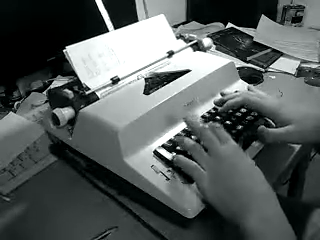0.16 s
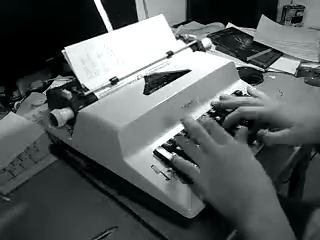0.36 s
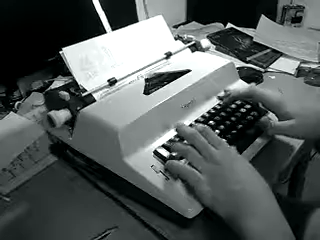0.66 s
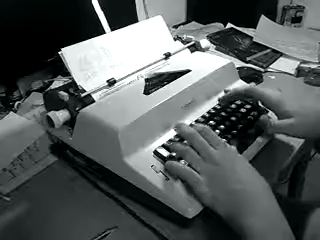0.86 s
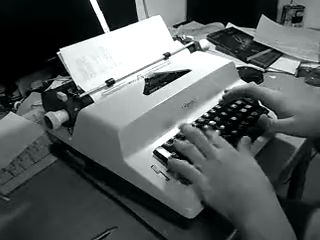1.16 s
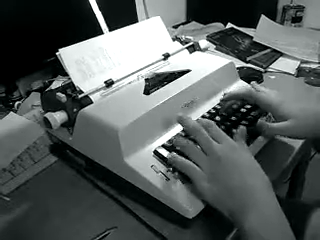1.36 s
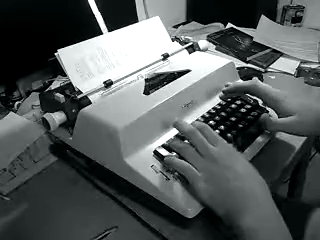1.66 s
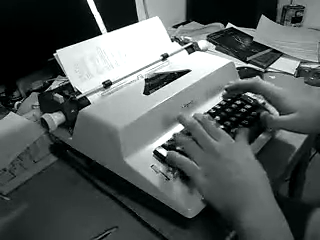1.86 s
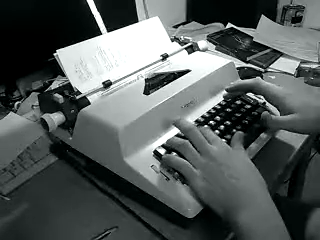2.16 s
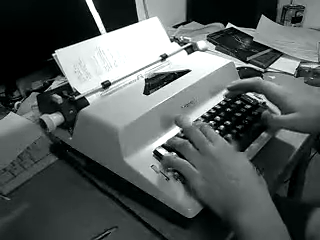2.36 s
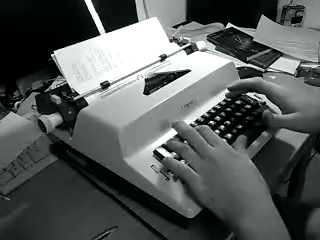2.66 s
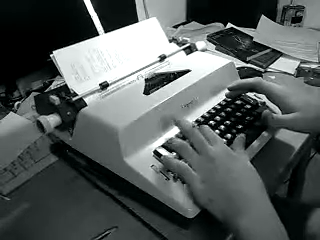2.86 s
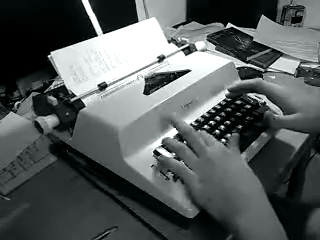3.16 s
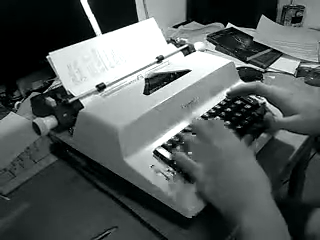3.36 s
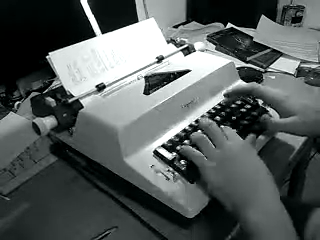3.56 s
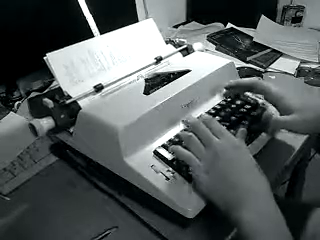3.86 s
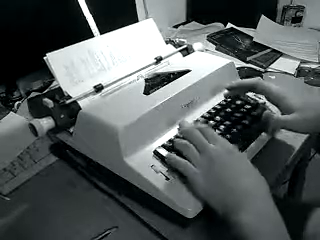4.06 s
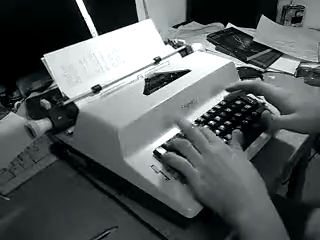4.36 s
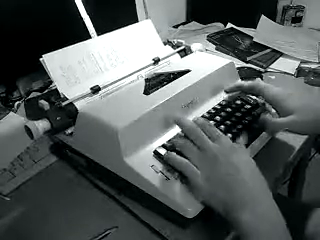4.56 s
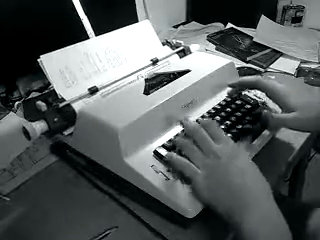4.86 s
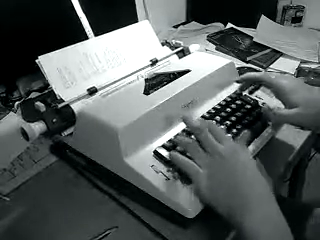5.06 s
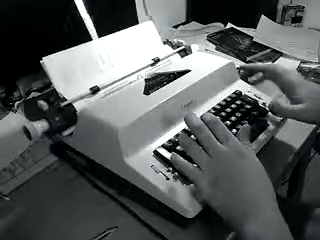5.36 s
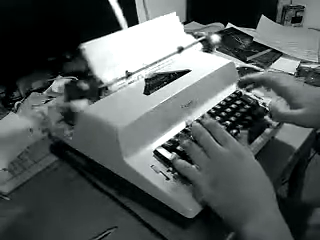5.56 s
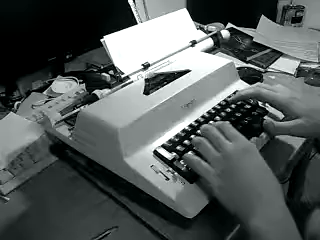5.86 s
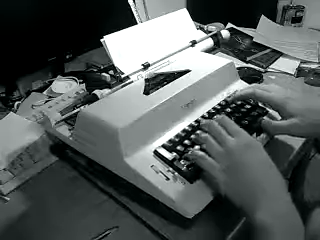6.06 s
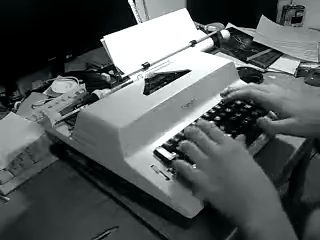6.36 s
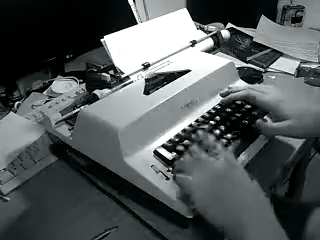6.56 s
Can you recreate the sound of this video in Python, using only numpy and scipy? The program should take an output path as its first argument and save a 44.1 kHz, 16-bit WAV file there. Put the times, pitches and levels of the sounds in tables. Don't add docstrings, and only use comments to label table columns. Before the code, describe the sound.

A typewriter is heard very close and dry through a small, thin-sounding microphone in a quiet room. From 0.06 s, strokes fall irregularly, about two to four a second: a small latch click, a sharp bright crack, a quick steel rattle, then a dull padded thud through casing and desk. Softer carriage steps with short, high metallic pings fall between, as at 0.3, 0.64, 1.03 and 1.76 s. Small gaps open around 1.9 and 2.65 s; a tight run of three blows comes at 2.9-3.2 s, and more typing continues to 5.1 s. At 5.3-5.4 s the return mechanism clacks and pings. The carriage grinds and whirrs quietly from 5.46 to 5.75 s, then slams into its stop at 5.8 s and bounces at 5.85 s. Faint jingling settles after 6 s over barely audible motor hum and air, until a weak key click at 6.65 s.

```python
import sys
import numpy as np
from scipy import signal
from scipy.io import wavfile
from scipy.ndimage import uniform_filter1d

SR = 44100
rng = np.random.default_rng(int(sys.argv[2]) if len(sys.argv) > 2 else 0)


def store_pcm(level_fs):
    pcm = np.round(np.clip(level_fs, -1, 1) * 32767).astype(np.int16)
    wavfile.write(sys.argv[1], SR, np.atleast_2d(pcm).T)


def magnitude_from_level(level_db):
    exponent = np.asarray(level_db, float) / 20
    return 10 ** exponent


N = 295470

# start_s, rattle_db, ring_hz, lower_body_db (against treble), crack_db
LETTERS = [(0.0932, -6, 3800, -16.5, -6), (0.4555, -4, 5670, -11.5, -9.5), (1.2905, -3.5, 6070, -14, -16),
           (1.5312, -5.5, 6100, -26.5, -10.5), (2.2777, -4, 5910, -15, -6.5),
           (2.8886, -4.5, 5750, -17.5, -4.5), (3.056, -4, 5800, -18, -9.5), (3.2243, -3.5, 6010, -18, -6.5),
           (3.6504, -6.5, 5150, -28, -9.5), (3.8272, -6, 5350, -21.5, -3.5),
           (4.388, -4.5, 6140, -13.5, -8.5), (4.7543, -5, 5190, -24.5, -7), (5.0575, -4, 5760, -13.5, -11)]
# start_s, rattle_db, ring_hz, lower_body_db, crack_db
STEPS = [(0.2987, -11, 3800, -18.5, -14.5), (0.6384, -10.5, 3780, -7, -28.5),
         (0.8130, -10.5, 5350, -22, -31), (1.0265, -13, 3840, -16, -31.5), (1.7635, -9, 3705, -18.5, -29),
         (2.5376, -15.5, 3380, -25.5, -21.5), (3.4106, -11, 4750, -30, -28), (4.1743, -9, 5320, -11, -13),
         (4.5735, -11.5, 5470, -14, -26), (4.8975, -10.5, 2830, -25.5, -34.5)]
# start_s, peak_db, ring_hz
EARLY_REBOUNDS = [(0.0945, -12.5, 5670), (0.096, -12.5, 2650), (0.4546, -11, 2660), (1.5321, -9, 2700),
                  (0.1157, -9, 5810), (0.2517, -24, 4900), (0.3007, -16, 3600), (0.3233, -20.5, 5000),
                  (0.334, -15, 6740), (0.4234, -23.5, 5320), (0.4344, -20.5, 6300), (0.4586, -9.5, 4320),
                  (0.4635, -15, 5040), (0.4911, -15.5, 5640), (0.6214, -25.5, 5040), (0.6415, -10.5, 3710),
                  (0.6462, -21, 3670), (0.78, -22.5, 5760), (0.8255, -11.5, 3620), (0.8526, -16, 4900),
                  (0.8818, -22, 4480), (0.8986, -20.5, 4820), (0.9926, -23, 5440), (1.039, -20.5, 3730),
                  (1.0435, -21.5, 3680), (1.069, -16.5, 4430), (1.271, -27, 6040), (1.2927, -5.5, 5730),
                  (1.297, -13.5, 6070), (1.301, -9.5, 5660), (1.315, -8.5, 6100), (1.5317, -15.5, 5180),
                  (1.5388, -7, 5080), (1.563, -12, 5930), (1.5825, -12, 5080), (1.7259, -28.5, 5400),
                  (1.761, -12, 5070), (1.7655, -21.5, 5400), (1.7723, -12.5, 3580), (1.777, -14.5, 3700),
                  (2.277, -4, 5630), (2.284, -10, 5570), (2.291, -10.5, 5870), (2.3004, -8.5, 5960),
                  (2.3106, -9.5, 5840), (2.3294, -11.5, 6300), (2.5027, -23.5, 5880), (2.524, -16.5, 4870),
                  (2.5394, -15, 3530), (2.5562, -18.5, 4900), (2.891, -12, 5540), (2.8957, -6.5, 5480),
                  (2.9066, -20, 5800), (2.9114, -10.5, 6000), (2.9304, -10.5, 6170), (3.0365, -19, 6030),
                  (3.0573, -8, 5540), (3.0639, -7.5, 5620)]
# start_s, peak_db, ring_hz
LATE_REBOUNDS = [(3.0791, -14.5, 5740), (3.0891, -11.5, 6000), (3.1135, -17.5, 5660), (3.1236, -22, 5770),
                 (3.225, -10.5, 6100), (3.232, -13, 5600), (3.247, -8, 5300), (3.2576, -13, 5900),
                 (3.2803, -22.5, 6070), (3.4127, -20.5, 3940), (3.424, -20, 5270), (3.444, -15.5, 4800),
                 (3.478, -19, 4460), (3.651, -8.5, 2670), (3.6632, -13.5, 4850), (3.7022, -17, 4500),
                 (3.7188, -27.5, 5630), (3.8282, -9.5, 6300), (3.8354, -6.5, 5040), (4.1764, -9.5, 5500),
                 (4.2011, -11, 4920), (4.369, -23.5, 5900), (4.391, -4, 5480), (4.3965, -4, 5530),
                 (4.421, -9.5, 5170), (4.4397, -13, 5000), (4.4478, -13, 4960), (4.5331, -21.5, 5900),
                 (4.541, -16.5, 5400), (4.5875, -7.5, 4930), (4.6152, -10, 4880), (4.7551, -8, 5080),
                 (4.7617, -2.5, 5030), (4.765, -7, 5600), (4.7866, -16, 5360), (4.802, -10.5, 5600),
                 (4.9, -29, 5330), (4.912, -13, 5500), (4.9418, -12, 4750), (5.06, -8, 5580),
                 (5.0676, -10.5, 5780), (5.0895, -15, 5300), (5.11, -9.5, 4860), (5.1147, -20, 5740),
                 (5.3539, -19, 4900), (5.3587, -10.5, 4940), (5.3639, -16, 5400), (5.392, -16.5, 4260),
                 (5.414, -12, 2950), (5.4419, -21, 6000), (5.7517, -18.5, 5060), (5.758, -21, 5100),
                 (5.792, -17, 4800), (5.798, -13, 4150), (5.8534, -12, 4450)]
REBOUND_T60_S = 0.022
# start_s, level_db, whirr_hz, whirr_db
SLIDE = [
    (5.46, -52, 406, -65),
    (5.488, -50, 368, -71),
    (5.518, -43.5, 350.4, -54.5),
    (5.65, -46, 365, -57.5),
    (5.686, -47, 377, -62.5),
    (5.746, -51, 360, -48.5),
]


def evened(x):
    return x / np.sqrt(np.mean(x ** 2) + 1e-20)


def colour(x, points):
    f, db = np.transpose(points)
    hz = abs(np.fft.fftfreq(4096, 1 / SR))
    gain_db = np.interp(np.log(hz + 1), np.log(f + 1), db)
    log_gain = np.log(magnitude_from_level(np.maximum(gain_db, -100)))
    minimum_phase = -signal.hilbert(log_gain).imag
    taps = np.fft.ifft(np.exp(log_gain + 1j * minimum_phase)).real[:2048]
    return signal.oaconvolve(x, taps / np.linalg.norm(taps))[:len(x)]


def resonate(x, hz, width):
    r = np.exp(-np.pi * width / SR)
    turn = 2 * np.pi * hz / SR
    gain = np.sin(turn) * np.sqrt(2 - 2 * r * r)
    return signal.lfilter([gain], [1, -2 * r * np.cos(turn), r * r], x)


def filtered(x, order, hz, kind):
    return signal.sosfilt(signal.butter(order, hz, kind, fs=SR, output="sos"), x)


def add(mix, s, sound):
    part = mix[round(s * SR):][:len(sound)]
    part += sound[:len(part)]


def chatter(per_s, spread_db):
    size = magnitude_from_level(spread_db * np.minimum(rng.exponential(1, N), 4)) * rng.standard_normal(N)
    return evened(size * (rng.random(N) < per_s / SR))


def shake(db, rise, t60, bend, jump_db):
    t = np.arange(-.04, .4, 1 / SR)
    fall_db = -60 * (np.maximum(t, 0) / t60) ** bend
    fall_db -= 60 * (np.maximum(t, 0) / 0.3) ** 4
    return magnitude_from_level(db + np.where(t < 0, 20 * t / rise - jump_db, fall_db))


def many_parts(knocks, width, count):
    part = rng.integers(0, count, N)
    pitches = (np.arange(count) + rng.random(count)) * 16000 / count + 300
    return sum(resonate(knocks * (part == k), hz, width) for k, hz in enumerate(pitches))


def kinds_of_blow():
    # start_s, rattle_db, ring_hz, lower_body_db, crack_db
    latches = [(0.0595, -22.5, 5350, -4.5, -36), (0.079, -16, 5260, -0.5, -39.5),
               (1.2715, -22, 6000, -8, -43), (1.5195, -13.5, 4470, -3.5, -42.5),
               (2.2515, -29.5, 5530, -3, -52.5), (2.8494, -51.5, 5580, 8.5, -69),
               (2.8654, -30.5, 5560, -28.5, -51), (3.035, -21, 6070, -3.5, -32.5),
               (3.1986, -23.5, 5330, -1, -41.5), (3.6157, -36, 5170, 5.5, -51),
               (3.6366, -15, 2820, -2, -29.5), (4.3663, -19, 6070, -8, -35.5),
               (4.7435, -15, 6800, -2.5, -36.5), (5.033, -22.5, 6240, -2, -27.5),
               (6.6518, -47.5, 5500, -5.5, -54), (6.6618, -30, 5630, -22, -55),
               (6.686, -30.5, 4630, -23, -48)]
    # start_s, rattle_db, ring_hz, lower_body_db, crack_db
    presses = [(0.2309, -32.5, 4450, -26, -40.5), (0.2508, -19.5, 5410, -7.5, -39),
               (0.6, -24, 5530, -7.5, -45), (0.622, -23.5, 5520, -10, -40), (0.755, -57, 5580, -13, -58),
               (0.7776, -22, 5630, -7.5, -38.5), (0.9647, -39.5, 5490, 2.5, -54),
               (0.9906, -24, 5560, -10, -40.5), (1.725, -25, 5445, -7, -36.5),
               (2.4658, -45, 4750, -21, -42), (2.4922, -25.5, 5850, -6.5, -28),
               (3.3687, -22, 5490, -3, -38.5), (3.797, -35.5, 5500, -4.5, -44),
               (3.816, -17, 4430, 0.5, -38.5), (4.1061, -51, 5870, 2, -59.5),
               (4.1298, -28, 5290, -5.5, -32), (4.5326, -23, 5380, -3, -29.5),
               (4.727, -29, 5580, -3, -45.5)]
    # start_s, rattle_db, ring_hz, lower_body_db, crack_db
    knocks = [(0.322, -17.5, 4700, -24.5, -12.5), (0.8495, -14, 4570, -8, -20),
              (1.0657, -14.5, 4570, -7, -28), (1.3159, -18, 6020, -15, -22), (2.5243, -13, 5300, -10, -33),
              (2.5564, -15, 4700, -24.5, -18.5), (3.4432, -15, 5470, 0, -14.5),
              (4.157, -18, 5300, -22, -37), (4.2006, -15, 4740, -1.5, -30), (4.6148, -14, 4700, -2, -12.5),
              (4.9428, -13, 4900, -1.5, -14), (5.3534, -24, 4900, 4, -10.5)]
    # start_s, rattle_db, ring_hz, lower_body_db, crack_db
    dry_taps = [
        (0.4245, -19.5, 6170, -6.5, -24.5),
        (0.4334, -17, 6150, -27.5, -37.5),
        (2.8, -64, 2500, 14, -64),
        (5.7516, -9.5, 4820, -5.5, -19),
    ]
    # start_s, rattle_db, ring_hz, lower_body_db, crack_db
    carriage_return = [
        (5.3112, -27.5, 3470, -6.5, -47),
        (5.3353, -15.5, 3560, -10, -40.5),
        (5.391, -13, 4270, -5, -17),
        (5.4114, -23, 3750, 7.5, -16),
        (5.5982, -35, 5070, -8, -43.5),
        (5.697, -32, 5000, 5, -57),
        (5.7907, -6.5, 4480, -26, -24),
        (5.8108, -26, 5460, 2, -16),
        (5.852, -18.5, 4670, 2.5, -16.5),
    ]
    # start_s, rattle_db, ring_hz, lower_body_db, crack_db
    settling = [
        (6.001, -40.5, 5760, 0, -36.5),
        (6.06, -55, 4950, -7, -55),
        (6.125, -55.5, 5070, 6, -56),
        (6.2468, -60, 4810, 10, -56.5),
        (6.3886, -58, 3860, 8, -58),
    ]
    return [(LETTERS, 0.007, 8, 0.26, 0.01, 0.11),
            (latches, 0.007, 4.1, 0.39, 0.007, 0.18),
            (STEPS, 0.015, 2.2, 0.22, 0.015, 0.025),
            (presses, 0.026, 1.9, 0.3, 0.022, 0.04),
            (knocks, 0.0077, 5, 0.18, 0.014, 0.072),
            (dry_taps, 0.004, 6, 0.11, 0.018, 0.19),
            (carriage_return, 0.0082, 3.8, 0.24, 0.041, 0.21),
            (settling, 0.01, 4.1, 0.36, 0.081, 0.71)]


def rattles():
    return [(s, db, rise, jump_db, t60, hz, low_db)
            for blows, rise, jump_db, t60, *_ in kinds_of_blow()
            for s, db, hz, low_db, _ in blows]


def contacts():
    return [(row[0] + 0.00063, row[-1], t60, share)
            for blows, *_, t60, share in kinds_of_blow()
            for row in blows]


def type_bars():
    # pitch_hz, level_db (per Hz)
    steel_colour = [(35, -43.5), (60, -46.5), (153, -49), (458, -23.5), (968, -7.5), (1140, -9.5),
                    (1820, -8), (2770, -1), (3040, -4.5), (3670, -2.5), (5860, -0.5), (7750, -9),
                    (9130, -17), (13000, -25), (16000, -38.5)]
    # pitch_hz, width_hz, level_db (against the broad sound)
    frame_modes = [(5760, 62, -24), (5910, 24, -28), (6070, 24, -28), (5300, 340, -18.5), (5880, 3540, -6),
                   (4420, 80, -35.5), (9100, 880, -13.5)]
    force, low_force, rings, cracks, dull = np.zeros((5, N))
    own = chatter(per_s=1400, spread_db=-0.5)
    t = np.arange(1500) / SR
    for s, db, rise, jump_db, t60, hz, low_db in rattles():
        rattle = shake(db - 17.5, rise, t60, bend=1.338, jump_db=jump_db)
        add(force, s - .04, rattle ** 2)
        add(low_force, s - .04, (rattle * magnitude_from_level(low_db)) ** 2)
        struck = own[round(s * SR):][:len(rattle)]
        add(rings, s - .04, resonate(struck * rattle[:len(struck)], hz, width=150))

    hits = contacts()
    bursts = rng.choice([-1., 1.], (len(hits), len(t)))
    for (s, db, t60, share), burst in zip(hits, bursts):
        blunt = np.clip((-27.5 - db) / 30, .2, .8)
        burst = signal.lfilter([np.sqrt(1 - blunt ** 2)], [1, -blunt], burst)
        crack = magnitude_from_level(db - 4 - 60 * t / max(t60, .02)) * np.minimum(t / .0006, 1) * burst
        add(cracks, s - .001, crack)
        add(cracks, s - .0006, magnitude_from_level(db - 0.5) * burst[:1])
        add(dull, s - .001, share * crack)

    for s, db, _ in EARLY_REBOUNDS + LATE_REBOUNDS:
        add(force, s - .0005, magnitude_from_level(db - 22 - 60 * t / REBOUND_T60_S) ** 2)
    run = signal.windows.tukey(round((SLIDE[-1][0] - SLIDE[0][0]) * SR), .2)
    add(force, SLIDE[0][0], (magnitude_from_level(-59.5) * run) ** 2)

    knocks = np.sqrt(force) * chatter(per_s=9000, spread_db=0.0)
    treble = filtered(knocks, 2, 7500, "high")
    hardness = np.minimum(force / magnitude_from_level(-27.5) ** 2, 4)
    knocks = knocks + treble * (magnitude_from_level(-3.5) * hardness ** 0.036 - 1)
    frame = sum(magnitude_from_level(db) * resonate(knocks, f, w) for f, w, db in frame_modes)
    cracks = filtered(cracks, 1, (1300, 9000), "band")
    steel = colour(cracks + frame + many_parts(knocks, width=170, count=80), steel_colour)
    body = resonate(np.sqrt(low_force) * chatter(per_s=3200, spread_db=-3.5), hz=2240, width=1500)
    body = filtered(body, 2, 500, "high")
    return steel + resonate(dull, hz=2000, width=680) + body + magnitude_from_level(-3) * rings


def thuds():
    # start_s, peak_db, t60_s, boom_db (desk against casing)
    carriage_thuds = [
        (5.353, -33.5, 0.23, 1),
        (5.429, -39, 0.49, -15),
        (5.808, -13, 0.22, -2),
        (5.849, -13, 0.11, -27),
        (6.002, -44, 0.2, -18),
        (6.055, -49, 0.31, -21),
        (6.162, -53, 0.39, -24),
        (6.656, -43.5, 0.47, -18),
    ]
    # peak_db, boom_db (desk against casing)
    letter_falls = [(-18, -13), (-17, -12), (-18, -12.5), (-22.5, -15.5), (-16, -8.5), (-15, -9.5),
                    (-21, -5), (-17, -13.5), (-16, -21), (-16.5, -35.5), (-17, -20.5), (-18, -21),
                    (-16, -15)]
    # peak_db, boom_db (desk against casing)
    step_falls = [(-18.5, -13.5), (-19, -16.5), (-20, -14.5), (-14.5, -22), (-16.5, -16), (-18.5, -19),
                  (-17.5, -23.5), (-17.5, -24.5), (-19.5, -21.5), (-16.5, -19)]
    falls = [(row[0] + 0.064, db, 0.21, boom_db) for row, (db, boom_db) in zip(LETTERS, letter_falls)]
    falls += [(row[0] + 0.062, db, 0.19, boom_db) for row, (db, boom_db) in zip(STEPS, step_falls)]
    return falls + carriage_thuds


def casing():
    # pitch_hz, level_db (per Hz)
    casing_colour = [(150, -28.5), (250, 11.5), (331, -17.5), (580, 11.5), (835, -1.5), (986, -1),
                     (1200, 4), (3000, 1), (3900, -43.5), (6600, -120)]
    # pitch_hz, width_hz, level_db (against the broad sound)
    cover_modes = [(961, 15, -9), (988, 18, -12), (1050, 35, -12), (567, 33, -11), (426, 28, -6.5),
                   (250, 22, -11), (1387, 40, -16)]
    force, boom, landings, stamps = np.zeros((4, N))
    falls = thuds()
    rocking = rng.uniform(-1.1, 1, (len(falls), 4))
    for (s, db, t60, boom_db), rock in zip(falls, rocking):
        thud = shake(db - 12.5, 0.028, t60, bend=0.9, jump_db=3)
        add(force, s - .04, thud ** 2)
        add(boom, s - .04, (thud * magnitude_from_level(boom_db)) ** 2)
        add(landings, s + 0.0037, magnitude_from_level([db - 3]))
        add(landings, s + .009 + 0.0012 * rock[0], magnitude_from_level([db - 0.5]) * rock[1])
        add(landings, s + 0.033 + 0.0029 * rock[2], magnitude_from_level([db - 0.5]) * rock[3])
        add(stamps, s + 0.005, magnitude_from_level([db + boom_db - 1]))
    for s, db, rise, _, t60, _, low_db in rattles():
        jolt = shake(db + low_db - 25, rise, t60, bend=2.1, jump_db=8.5)
        add(force, s - .04, jolt ** 2)
        add(boom, s - .03, (jolt * magnitude_from_level(-9.0)) ** 2)
    knocks = np.sqrt(force) * chatter(per_s=3000, spread_db=1.0) + landings
    cover = colour(knocks, casing_colour)
    cover = cover + sum(magnitude_from_level(db) * resonate(knocks, f, w) for f, w, db in cover_modes)
    cover = signal.lfilter(*signal.iirnotch(345, 4, fs=SR), cover)
    pushes = np.sqrt(boom) * chatter(per_s=3000, spread_db=-0.5) + stamps
    desk = resonate(pushes, hz=134, width=20) + magnitude_from_level(-28.5) * resonate(pushes, hz=146, width=150)
    return cover + desk


def carriage():
    # pitch_hz, level_db (per Hz)
    grind_colour = [(47, -40), (80, -21), (127, 0.5), (309, -6), (353, 0), (482, -1.5), (1400, 0),
                    (1630, 3), (2180, -2), (5050, -4), (16000, -53.5)]
    # pitch_hz, width_hz, level_db
    rail_modes = [(1660, 32, -12), (2480, 24, -15.5), (8630, 60, -26), (10960, 200, -31)]
    s, *columns = np.transpose(SLIDE)
    t = np.arange(s[0], s[-1], 1 / SR)
    level_db, hz, whirr_db = (np.interp(t, s, c) for c in columns)
    rolls = chatter(per_s=6000, spread_db=1.6)
    rolls = rolls * magnitude_from_level(evened(uniform_filter1d(rng.standard_normal(N), size=600)))
    grind = colour(rolls, grind_colour)[:len(t)]
    grind = grind + sum(magnitude_from_level(db) * resonate(rolls, f, w) for f, w, db in rail_modes)[:len(t)]
    wobble = 1.13 + 0.25 * evened(uniform_filter1d(rng.standard_normal(len(t)), size=500))
    whirr = np.sqrt(2) * magnitude_from_level(whirr_db) * wobble * np.sin(2 * np.pi * np.cumsum(hz) / SR)
    out = np.zeros(N)
    add(out, s[0], (magnitude_from_level(level_db) * grind + whirr) * signal.windows.tukey(len(t), .15))
    return out


def pawl():
    # start_s, peak_db, pitch_hz, overtone_db
    pings = [(0.109, -18.5, 3810, -26), (0.2986, -6.5, 3720, -18), (0.6389, -2.5, 3660, -16.5),
             (0.825, -12, 3696, -24), (1.038, -10, 3690, -15), (1.7719, -7.5, 3645, -12),
             (2.5386, -11.5, 3610, -15), (2.8896, -16, 4130, -13), (3.058, -6, 4230, -7),
             (3.2243, -12, 4060, -12), (3.652, -14, 2640, -11.5), (4.175, -12.5, 4490, -23),
             (4.5824, -11.5, 2890, -6), (4.907, -11.5, 2740, -14), (5.0584, -8.5, 3540, -14.5),
             (5.3888, -7, 4390, -10)]
    out, t = np.zeros(N), np.arange(6000) / SR
    onset = np.minimum(t / 0.0063, 1)
    for s, db, hz, over_db in pings:
        tone = magnitude_from_level(-60 * t / 0.033) * np.sin(2 * np.pi * hz * t)
        second = magnitude_from_level(over_db - 5 - 60 * t / .15) * np.sin(2 * np.pi * 2.005 * hz * t)
        third = magnitude_from_level(over_db - 17 - 60 * t / .09) * np.sin(2 * np.pi * 3.14 * hz * t)
        is_pawl = 3600 < hz < 3850
        add(out, s, magnitude_from_level(db) * (tone + is_pawl * (second + third)) * onset)
    return out


def small_parts():
    # start_s,
    # peak_db, pitch_hz
    wires = [(0.081, -32, 8200), (0.112, -18.5, 7550), (2.3245, -41, 14200), (3.655, -41, 14100),
             (3.861, -43, 13400), (4.174, -39, 14200), (4.586, -38, 11800), (5.388, -39.5, 11200),
             (6.688, -36, 4600), (5.802, -24.5, 1030), (5.805, -23.5, 1490), (5.793, -31, 2290),
             (5.848, -21.5, 2230), (5.85, -25, 1490)]
    # start_s, peak_db, ring_hz
    glints = [(0.0932, -29.5, 9110), (0.2975, -34, 9000), (0.323, -24, 9070), (0.4555, -26.5, 8700),
              (0.4653, -27.5, 9840), (0.8519, -33.5, 8550), (1.2916, -24.5, 8830), (1.3007, -31, 8740),
              (1.3317, -34.5, 9800), (1.5308, -26, 8940), (1.7508, -34, 10210), (1.77, -29, 9240),
              (1.7759, -25, 9260), (2.2771, -30, 8910), (2.3255, -27, 9470), (2.5369, -28.5, 9390),
              (2.544, -24.5, 9300), (2.8889, -29, 9000), (2.9002, -31.5, 9020), (3.0569, -23, 9040),
              (3.1222, -30, 9370), (3.2249, -29.5, 9020), (3.424, -30, 9350), (3.4423, -25, 9600),
              (3.6524, -28, 9190), (3.6605, -23, 9630), (3.827, -35, 9020), (4.1769, -30, 9300),
              (4.2007, -24, 9560), (4.3895, -33, 8720), (4.4224, -32.5, 8700), (4.4385, -31.5, 9370),
              (4.5943, -31, 11560), (4.613, -28, 10080), (4.9115, -33, 11480), (4.9413, -24, 8480),
              (5.058, -30.5, 8960), (5.3891, -27, 10980), (5.75, -27, 8610)]
    out, t = np.zeros(N), np.arange(1500) / SR
    onset = np.minimum(t / .0005, 1)
    for s, db, hz in EARLY_REBOUNDS + LATE_REBOUNDS:
        add(out, s - .0005, onset * magnitude_from_level(db - 4 - 60 * t / REBOUND_T60_S) * np.sin(2 * np.pi * hz * t))
    for s, db, hz in wires:
        add(out, s, onset * magnitude_from_level(db - 60 * t / .06) * np.sin(2 * np.pi * hz * t))
    snaps = filtered(rng.standard_normal((len(glints), len(t))), 2, (7500, 12000), "band")
    for (s, db, hz), snap in zip(glints, snaps):
        ring = np.sin(2 * np.pi * hz * t) + snap
        add(out, s - .0005, onset * magnitude_from_level(db + 5.0 - 60 * t / .005) * ring)
    return out


def walls(x):
    at = np.arange(200, 30000, 20) + rng.integers(0, 20, 1490)
    taps = np.zeros(30100)
    taps[at] = rng.choice([-1., 1.], 1490) * magnitude_from_level(-60 * at / SR / .55)
    taps = signal.lfilter([1], [1, -.75], taps)
    return signal.oaconvolve(x, taps / np.linalg.norm(taps))[:N]


def room():
    # pitch_hz, level_db (per Hz)
    air_colour = [(20, -5), (43, -22), (123, -1), (319, -17), (678, -8), (2020, -18), (3800, -21),
                  (5000, -31), (16000, -46)]
    # pitch_hz, width_hz, level_db
    air_tones = [(700, 90, -12), (1060, 90, -19), (280, 50, -18)]
    hum = evened(resonate(rng.standard_normal(N), hz=122.4, width=6.6))
    noise = rng.standard_normal(N)
    air = colour_and_tones(noise, air_colour, air_tones)
    drift_db = evened(uniform_filter1d(rng.standard_normal(N), size=2000))
    return magnitude_from_level(-69.5 + drift_db) * air + magnitude_from_level(-75) * hum


def colour_and_tones(noise, points, tones):
    return colour(noise, points) + sum(magnitude_from_level(db) * resonate(noise, f, w) for f, w, db in tones)


def scene():
    machine = type_bars() + casing() + carriage() + small_parts()
    return (machine + magnitude_from_level(-30) * walls(machine) + pawl() + room())[None]


def noise_gate(heard):
    power_db = 10 * np.log10(abs(uniform_filter1d(heard[0] ** 2, size=400)) + 1e-12)
    cut_db = np.clip(0.61 * (-54 - power_db), 0, 4)
    step = 1 / (0.035 * SR)
    lasting_db = signal.lfilter([step], [1, step - 1], np.maximum(power_db, -90))
    hush_db = np.minimum(-60 - lasting_db, -60 - power_db)
    cut_db = cut_db + np.clip(hush_db, 0, 5)
    return heard / magnitude_from_level(uniform_filter1d(cut_db, size=300))


def top_cut(x):
    return signal.sosfilt(signal.butter(12, 16650, fs=SR, output="sos"), x)


def record(dry):
    heard = filtered(dry, 4, 94, "high") + magnitude_from_level(-22.5) * dry
    limited = .7 * np.tanh(noise_gate(heard) / .7)
    edge = signal.firwin(255, 15800, window=("kaiser", 8), fs=SR)
    mix = signal.oaconvolve(limited, edge[None], "same")
    return top_cut(mix)


dry = scene()
out = record(dry)
store_pcm(out)
```